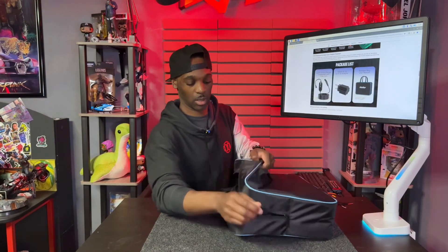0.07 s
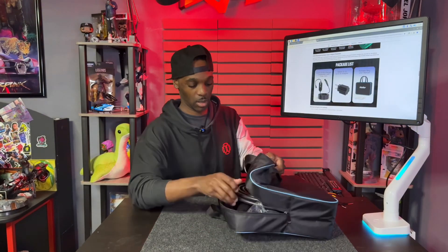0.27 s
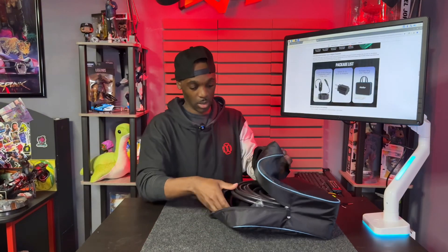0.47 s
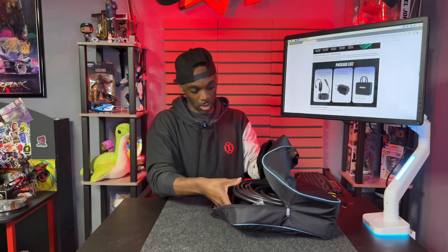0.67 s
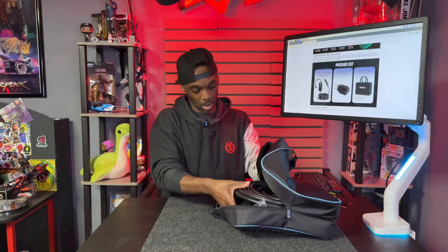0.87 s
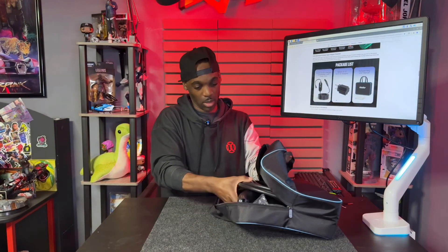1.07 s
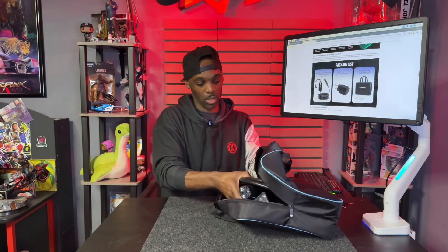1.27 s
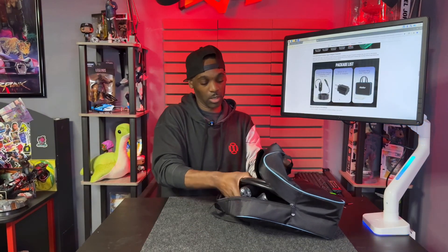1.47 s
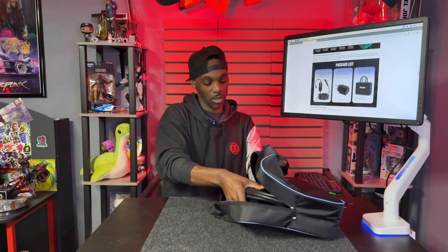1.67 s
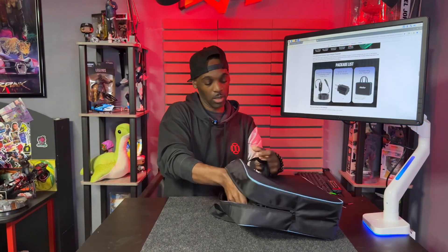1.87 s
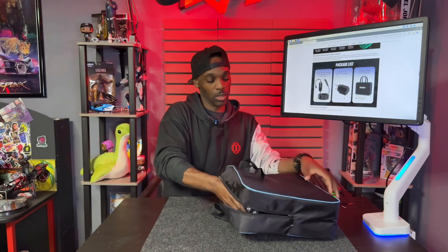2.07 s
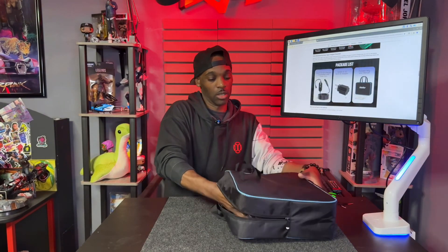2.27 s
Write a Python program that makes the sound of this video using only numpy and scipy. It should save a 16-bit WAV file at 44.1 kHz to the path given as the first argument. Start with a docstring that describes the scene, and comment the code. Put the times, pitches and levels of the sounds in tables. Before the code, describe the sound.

A zipper on a padded nylon bag hisses in short tugs with fabric rustling, close up in a very quiet room. Around 0.5 seconds something hollow and plastic knocks dully inside, followed by louder rasping until 0.8. Light swishes continue, then fade after 1.2. At 1.7 comes a louder, brighter cluster of plastic knocks. The flap drops with a soft thud at 2.2, the desk rumbling faintly underneath.

```python
"""Nylon brushes and a zip hisses in short tugs: hands work at a padded bag, close up in a very quiet room.
Thread slips over thread in tiny grains that ring as swish, crease and rasp, while the contents scuff
and the desk trembles underneath. The bag thuds softly as its flap drops. A hollow plastic thing inside
is knocked in two quick clusters, the first muffled, the second louder and brighter."""
import sys
import numpy as np
from scipy import signal
from scipy.fft import rfft, irfft
from scipy.io import wavfile

SR = 44100
rng = np.random.default_rng(int(sys.argv[2]) if len(sys.argv) > 2 else 0)


def transcribe(u):
    """Save the signal u as a 16-bit wav file named by the first command-line argument.

    u: samples, shape (n,) or (channels, n), limited to [-1, 1]; the rate is SR.
    q: integer samples, one column per channel.
    """
    v = np.clip(np.atleast_2d(u).T, -1, 1)
    q = np.round(v * 32767).astype(np.int16)
    wavfile.write(sys.argv[1], SR, q)


N = 102003

# brushing of nylon and zip: (time [s], level [dB], swish trim [dB], sheen trim [dB], fizz trim [dB])
BRUSH_LEVELS = [(0.0, -51, -10, -7, -2), (0.04, -60, -2, 1, 5), (0.07, -39, -7, -8, -5.5),
                (0.17, -49, -8, -7, -9), (0.22, -47.5, -8, -7.5, -1.5), (0.27, -57, -13.5, -16, -10.5),
                (0.35, -72.5, -8, 0.5, 3), (0.44, -45.5, -9, -4.5, -4.5), (0.49, -51.5, -13, -9, 0.5),
                (0.536, -38, -9.5, -5.5, -8), (0.545, -26, -6, -2, -5.5), (0.556, -37, -11, -0.5, 3),
                (0.566, -39.5, -5, -5, -12), (0.585, -49.5, -15, -0.5, -10), (0.6, -42.5, -5.5, -14, -9),
                (0.64, -32, -22, -8.5, -12.5), (0.66, -44, -4.5, -5.5, -6), (0.75, -40.5, -11.5, -3, -5),
                (0.8, -61.5, -7, -6, -7), (0.85, -61, -10.5, -31, -17), (0.89, -51, -0.5, -4.5, -0.5),
                (0.96, -55.5, 0, -8, -9.5), (1.02, -59, -20.5, -21, -14), (1.07, -49.5, -3, -32, -10),
                (1.1, -45.5, -13.5, -10, -1), (1.13, -50.5, -11, -9.5, -11), (1.2, -64, -6, -12, -12),
                (1.23, -57.5, 3, -9, -6), (1.27, -81, -4, 3, 1), (1.43, -93, -11, 2, 8),
                (1.45, -77, 2, 0.5, -13), (1.49, -83, -9, -8, -3), (1.55, -75, -14, 5, 11),
                (1.61, -83.5, -21, 6, 16), (1.67, -79, 0, -4, -8), (1.707, -41, -1, -4, 0.5),
                (1.717, -48.5, -3.5, 1, 1), (1.76, -61, -5, -9, -9.5), (1.83, -79.5, -11, -6, -2),
                (2.1, -86, -7, 2, -0.5), (2.13, -77.5, -17, 0, -4.5), (2.16, -83.5, -4, -4, 4),
                (2.21, -33.5, -23, -17.5, -9), (2.25, -53, -7.5, -8.5, -5.5), (2.31, -53.5, -4.5, -4, 0)]
# padding and zip tape: (time [s], crease level [dB], rasp level [dB])
CRUNCH_LEVELS = [(0.0, -65, -68), (0.04, -66, -68.5), (0.07, -58, -48.5), (0.13, -60.5, -54),
                 (0.2, -79.5, -70), (0.24, -77, -58.5), (0.32, -100, -91), (0.46, -79, -60.5),
                 (0.49, -86, -73), (0.51, -60, -59), (0.53, -66, -58), (0.55, -57, -40), (0.56, -42.5, -59),
                 (0.58, -56, -52.5), (0.652, -66, -62.5), (0.666, -52, -43), (0.69, -55.5, -64.5),
                 (0.76, -70.5, -60), (0.84, -88.5, -99), (0.94, -83.5, -93), (1.02, -88, -89),
                 (1.08, -80, -62.5), (1.2, -87.5, -82), (1.59, -92.5, -109), (1.65, -76, -82),
                 (1.68, -62, -74), (1.7, -41.5, -45), (1.707, -34, -38.5), (1.72, -38, -54),
                 (1.75, -55.5, -69), (1.84, -94, -93.5), (1.9, -81, -74.5), (1.96, -95.5, -91.5),
                 (2.15, -91, -100.5), (2.21, -62, -64), (2.26, -67, -64.5), (2.31, -54.5, -61)]
# four phrases of shifting contents: (time [s], low scuff [dB], high scuff [dB], padded body [dB])
SCUFF_PHRASES = [
    [(0.0, -72, -78, -90), (0.038, -91, -94, -77), (0.08, -75, -85, -72.5), (0.154, -87, -85, -81.5),
     (0.22, -79, -85, -73.5), (0.256, -94, -92, -73), (0.336, -83, -98, -92), (0.376, -91, -85, -71),
     (0.444, -74, -84, -86), (0.472, -83, -82, -79), (0.49, -55, -74, -96)],
    [(0.54, -61, -43, -54), (0.562, -47, -48, -45), (0.582, -86, -59, -57), (0.602, -88, -52, -57),
     (0.638, -87, -60, -79), (0.668, -63, -55.5, -71.5), (0.692, -58, -50, -54), (0.734, -77, -65.5, -76),
     (0.762, -71, -67, -76), (0.788, -81, -89, -93), (0.8, -88, -84, -83)],
    [(0.84, -86, -89, -80), (0.86, -93, -89, -84.5), (0.934, -77, -86, -75.5), (0.988, -80.5, -92, -84.5),
     (1.158, -72.5, -77, -71.5), (1.258, -102, -105, -86), (1.352, -81, -79, -75.5),
     (1.476, -102, -104, -88), (1.585, -76.5, -102, -84.5), (1.62, -83, -97, -82), (1.675, -56, -57, -68),
     (1.697, -47, -32, -43)],
    [(1.726, -33.5, -29, -43.5), (1.795, -68.5, -59.5, -75.5), (1.852, -78, -91, -82.5),
     (1.928, -67, -81.5, -59), (1.958, -89, -105, -66), (2.012, -80.5, -100, -83.5),
     (2.036, -81.5, -89, -62), (2.126, -97, -101, -93), (2.2, -56, -80, -42), (2.244, -58, -94, -57.5),
     (2.31, -65, -57, -52)],
]
# tremble of the desk: (time [s], deep level [dB], upper level [dB])
DESK_LEVELS = [(0.0, -68, -44), (0.02, -56, -74.5), (0.14, -81.5, -79), (0.22, -87, -62),
               (0.25, -72.5, -75.5), (0.47, -72.5, -83), (0.52, -63.5, -52.5), (0.64, -67.5, -80),
               (0.7, -59, -54.5), (0.75, -86, -88), (1.15, -61, -74), (1.22, -85, -81), (1.28, -50.5, -64),
               (1.31, -63, -80), (1.38, -43.5, -73), (1.52, -102, -80), (1.65, -55.5, -76.5),
               (1.685, -71.5, -68), (1.72, -48.5, -39), (1.85, -61.5, -81), (1.92, -67, -68),
               (2.14, -67.5, -74.5), (2.19, -46, -51), (2.21, -47, -45), (2.31, -81, -68)]
# resonances that colour nylon, padding, zip and desk: (pitch [Hz], width [Hz], relative level [dB])
SWISH_BANDS = [(4874, 800, 3.5), (5560, 1400, 5), (6280, 900, -0.5), (7220, 2700, 8)]
SHEEN_BANDS = [(8000, 1300, -5), (9200, 1300, -3), (10300, 1300, 0), (11300, 1300, -1)]
FIZZ_BANDS = [(12400, 1400, 0), (13400, 1400, -1), (14400, 1400, -2), (15200, 1000, -7)]
CREASE_BANDS = [(1416, 480, 2.5), (1894, 1100, 3), (2490, 1500, -2)]
BODY_BANDS = [(288.4, 270, -5.5), (368, 200, 7.5), (570, 230, 4)]
RASP_BANDS = [(3650, 1300, 7), (4398, 1000, 4.5)]
DESK_DEEP_BANDS = [(42.35, 30, 0)]
DESK_UPPER_BANDS = [(75.6, 65, -2.5), (133.7, 8.9, -4.5), (176, 190, -4.5)]
# colour of the room tone: (frequency [Hz], relative level [dB])
ROOM_SPECTRUM = [(18, -26.5), (30, 13), (66, -22.5), (256, -19.5), (691, -27), (1470, -28), (12900, -31),
                 (14300, -51), (15500, -44)]
# fabric swishes and the plastic's after-ring: (centre time [s], length [s], pitch [Hz], level [dB])
NARROW_SWELLS = [(0.078, 0.05, 2080, -49.5), (0.133, 0.038, 1980, -55), (0.227, 0.028, 1494, -72.5),
                 (0.384, 0.027, 1203, -71.5), (0.398, 0.082, 7360, -62.5), (0.519, 0.042, 1880, -54),
                 (1.083, 0.059, 2040, -74), (0.8, 0.14, 5190, -61), (1.077, 0.049, 11100, -42.5),
                 (1.082, 0.029, 10200, -43), (1.12, 0.078, 5140, -54), (1.216, 0.034, 5070, -65.5),
                 (1.229, 0.027, 9460, -54), (1.329, 0.04, 7750, -72.5), (1.328, 0.022, 4150, -75.5),
                 (1.452, 0.017, 4690, -67.5), (1.453, 0.013, 1510, -72), (1.775, 0.023, 927, -51.5),
                 (1.887, 0.015, 3040, -80.5), (1.097, 0.14, 2770, -74), (1.555, 0.06, 6180, -68.5),
                 (1.555, 0.056, 10440, -57), (1.804, 0.036, 4840, -70.5), (2.134, 0.042, 5960, -73.5),
                 (2.127, 0.03, 8120, -69.5), (2.201, 0.017, 2200, -59), (2.246, 0.049, 1790, -64.5)]
# soft thuds of the bag and deep swells of the desk: (time [s], peak [dB], pitch [Hz])
BAG_AND_DESK_THUDS = [(0.204, -51.5, 178), (0.22, -51.5, 269), (.592, -46.5, 490), (1.26, -53.5, 41.8),
                      (1.344, -52.5, 42), (1.392, -56, 42.3), (1.708, -52, 137), (1.724, -40, 231.9),
                      (2.19, -32, 377), (2.192, -31, 194.2), (2.208, -35, 119.4), (2.263, -44, 219)]
# knocks on the plastic: (time [s], relative level [dB], side-mode gain [dB per octave from main mode])
PLASTIC_KNOCKS = [(.472, -52.5, -36), (.493, -35.5, -32), (.506, -28.5, -21), (.511, -27, -31),
                  (.521, -37.5, -6), (1.6975, -16.5, 8.5), (1.7003, -12.5, 8), (1.7031, -9.5, -0.5),
                  (1.714, -23.5, -1), (1.730, -24.5, 0.5), (1.741, -30.5, -11.5), (1.763, -35.5, -19)]
# modes of the hollow plastic, main mode second: (pitch [Hz], relative level [dB], time constant [s])
PLASTIC_MODES = [(535, -5.5, 0.0052), (720, 5.5, 0.0025), (917, 2, 0.0014), (1036, -3, 0.0032),
                 (1200, -22, 0.0013), (1423, -23, 0.0023), (695, -28, 0.01), (984, -28, .009)]


def from_db(db):
    """Gain of a level in dB."""
    return 10 ** (np.asarray(db) / 20)


def unit_rms(x):
    """The signal scaled to rms 1."""
    return x / np.sqrt(np.mean(x ** 2) + 1e-20)


def fader_curves(rows):
    """One per-sample curve for each level column of a timed table."""
    times, *columns = np.transpose(rows)
    return [np.interp(np.arange(N) / SR, times, column) for column in columns]


def drift(rate_hz):
    """A slow random wander of unit spread: low-passed noise, drawn every few dozen samples."""
    hop, settle = 40, 2000
    pole = np.exp(-2 * np.pi * rate_hz * hop / SR)
    noise = rng.standard_normal(N // hop + settle + 2)
    slow = signal.lfilter([1], [1, -2 * pole, pole ** 2], noise)[settle:]
    return np.interp(np.arange(N) / hop, np.arange(len(slow)), unit_rms(slow))


def grain_band(hz, width_hz, grains_per_s=6000, spread_db=1):
    """Dense, uneven slips ring one resonance, stacked three times for steep skirts; rms 1."""
    size_db = spread_db * np.minimum(rng.exponential(1, N), 4)
    slips = from_db(size_db) * rng.standard_normal(N)
    grains = slips * (rng.random(N) < grains_per_s / SR)
    radius = np.exp(-np.pi * width_hz / SR)
    resonator = [1, 0, -1, 1, -2 * radius * np.cos(2 * np.pi * hz / SR), radius ** 2]
    return unit_rms(signal.sosfilt([resonator] * 3, grains))


def rubbed(bands, level_db, flicker_db=1.6):
    """A friction texture: grains ring in each band, and each band flickers on its own."""
    texture = sum(from_db(db + flicker_db * drift(rate_hz=20)) * grain_band(hz, width_hz)
                  for hz, width_hz, db in bands)
    return from_db(level_db) * unit_rms(texture)


def soft_ring(start_s, hz, tau_s):
    """A cushioned blow: a sine whose envelope swells to 1 over two time constants, then dies."""
    age = np.maximum(np.arange(N) / SR - start_s, 0)
    envelope = (age / tau_s / 2) ** 2 * np.exp(2 - age / tau_s)
    return envelope * np.sin(2 * np.pi * hz * age)


def nylon_brush():
    """Nylon and zip brush in three layers of hiss: swish below, sheen between, fizz on top."""
    level_db, swish_db, sheen_db, fizz_db = fader_curves(BRUSH_LEVELS)
    swish = rubbed(SWISH_BANDS, level_db + swish_db)
    sheen = rubbed(SHEEN_BANDS, level_db + sheen_db)
    fizz = rubbed(FIZZ_BANDS, level_db + fizz_db)
    return swish + sheen + fizz


def padding_and_zip():
    """Padding creases with a midrange crunch, and the zip tape rasps above it."""
    crease_db, rasp_db = fader_curves(CRUNCH_LEVELS)
    return rubbed(CREASE_BANDS, crease_db) + rubbed(RASP_BANDS, rasp_db)


def contents_scuff(width_hz=250):
    """Shifting contents rub the plastic's modes, over the dull body of the padded bag."""
    low_db, high_db, body_db = fader_curves(np.vstack(SCUFF_PHRASES))
    bands = [(hz, width_hz, db / 2) for hz, db, _ in PLASTIC_MODES]
    return rubbed(bands[1:2], low_db) + rubbed(bands[2:5], high_db) + rubbed(BODY_BANDS, body_db)


def desk_tremble():
    """The desk rumbles under the bag in its deep and upper resonances."""
    deep_db, upper_db = fader_curves(DESK_LEVELS)
    return rubbed(DESK_DEEP_BANDS, deep_db) + rubbed(DESK_UPPER_BANDS, upper_db)


def room_tone(level_db=-71.5):
    """A faint, steady bed of noise with its weight in the sub-bass."""
    hz = np.maximum(np.fft.rfftfreq(N, 1 / SR), 1)
    point_hz, point_db = np.transpose(ROOM_SPECTRUM)
    colour = from_db(np.interp(np.log(hz), np.log(point_hz), point_db))
    bed = irfft(rfft(rng.standard_normal(N)) * colour, N)
    return from_db(level_db) * unit_rms(bed)


def narrow_swells(width_share=0.16):
    """Brief swells of narrow noise: fabric swishes and the plastic's ring after the knocks."""
    t = np.arange(N) / SR
    swells = np.zeros(N)
    for centre_s, length_s, hz, db in NARROW_SWELLS:
        envelope = np.exp(-4 * ((t - centre_s) / length_s) ** 2)
        swells += from_db(db) * envelope * grain_band(hz, width_share * hz)
    return swells


def bag_and_desk_thuds(tau_cycles=0.64):
    """Soft thuds of the bag and deep swells of the desk, each ringing for only a few cycles."""
    return sum(from_db(db) * soft_ring(start_s, hz, tau_cycles / hz)
               for start_s, db, hz in BAG_AND_DESK_THUDS)


def plastic_knocks(trim_db=-8.0):
    """Each knock rings the hollow plastic; muffled ones keep mostly the main mode."""
    main_hz = PLASTIC_MODES[1][0]
    knocks = np.zeros(N)
    for start_s, knock_db, db_per_octave in PLASTIC_KNOCKS:
        for hz, mode_db, tau_s in PLASTIC_MODES:
            tone_db = db_per_octave * abs(np.log2(hz / main_hz))
            knocks += from_db(knock_db + mode_db + tone_db + trim_db) * soft_ring(start_s, hz, tau_s)
    return knocks


def scene():
    """Bag, desk and room mixed to one channel."""
    handling = nylon_brush() + padding_and_zip() + contents_scuff()
    bed = desk_tremble() + room_tone()
    accents = narrow_swells() + bag_and_desk_thuds() + plastic_knocks()
    return (handling + bed + accents)[None]


def record(dry):
    """A steep high cut takes off the topmost air."""
    stop_hz, stop_db = 15900, 60
    high_cut = signal.cheby2(14, stop_db, stop_hz, fs=SR, output="sos")
    return signal.sosfilt(high_cut, dry)


dry = scene()
out = record(dry)
transcribe(out)
```